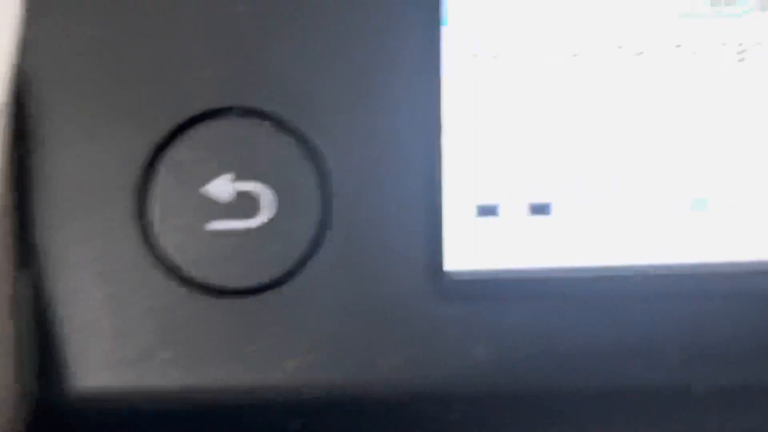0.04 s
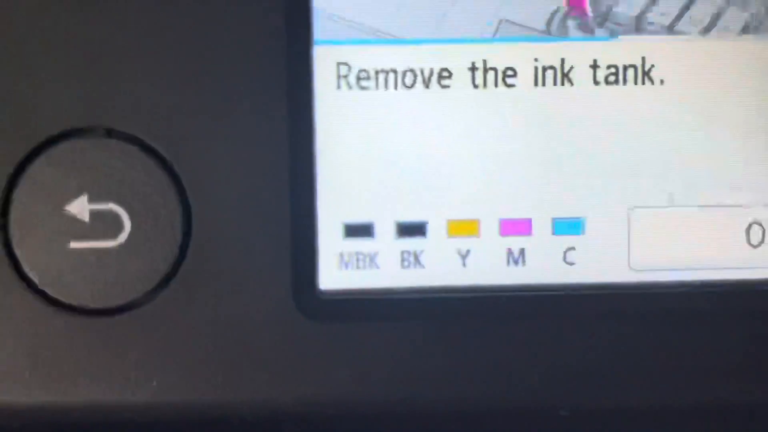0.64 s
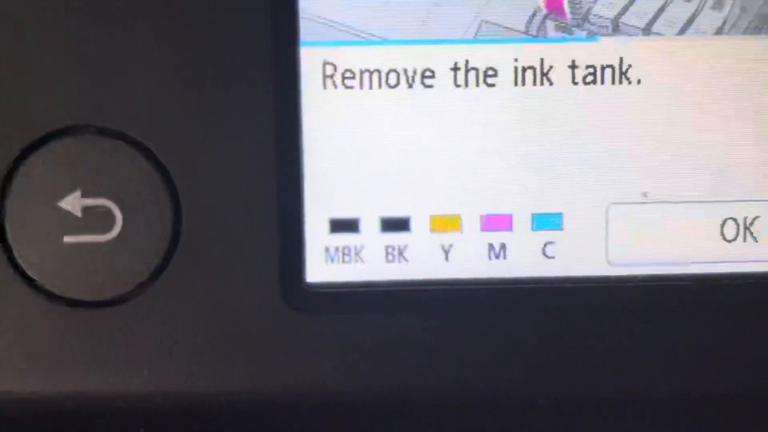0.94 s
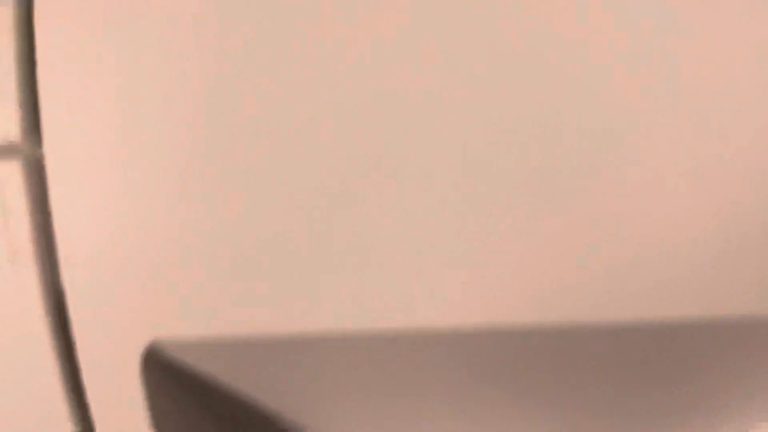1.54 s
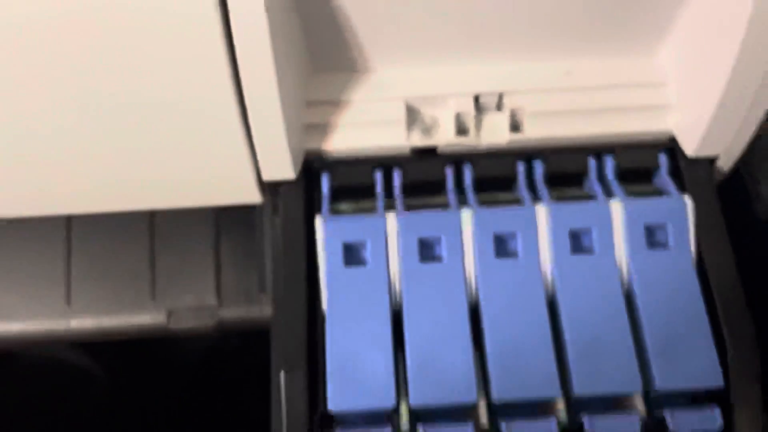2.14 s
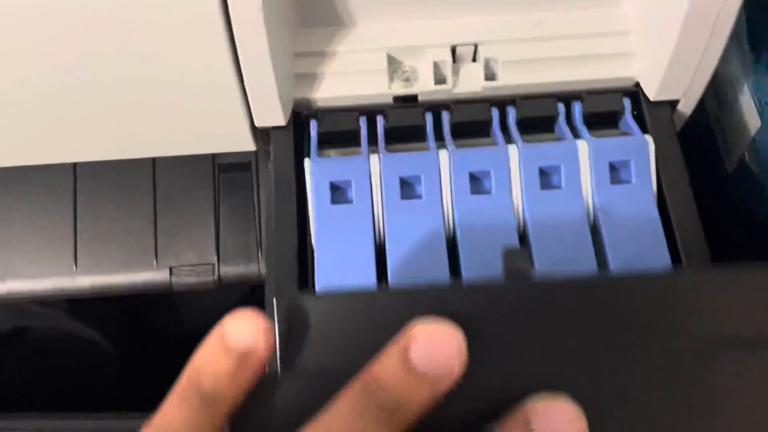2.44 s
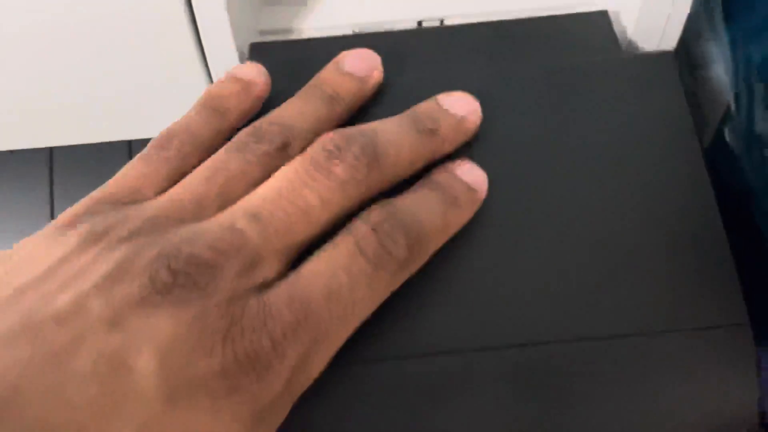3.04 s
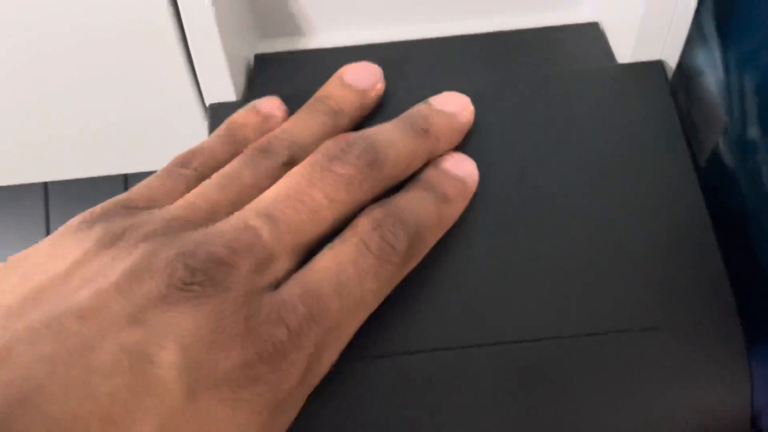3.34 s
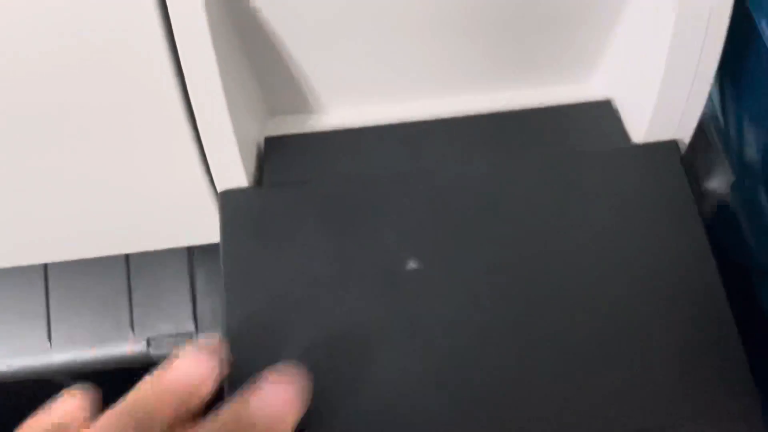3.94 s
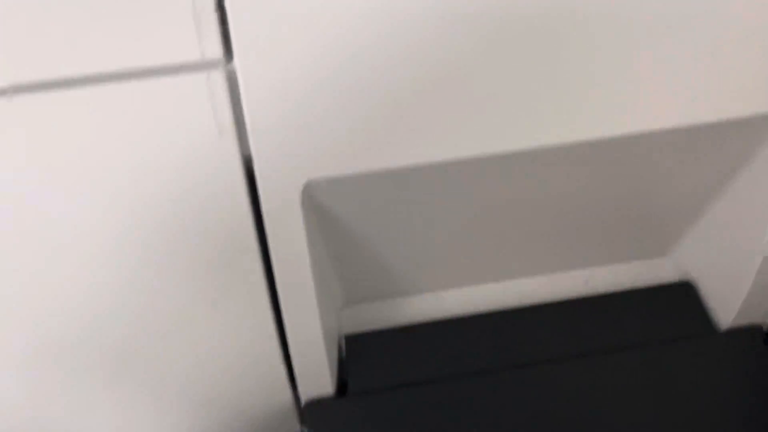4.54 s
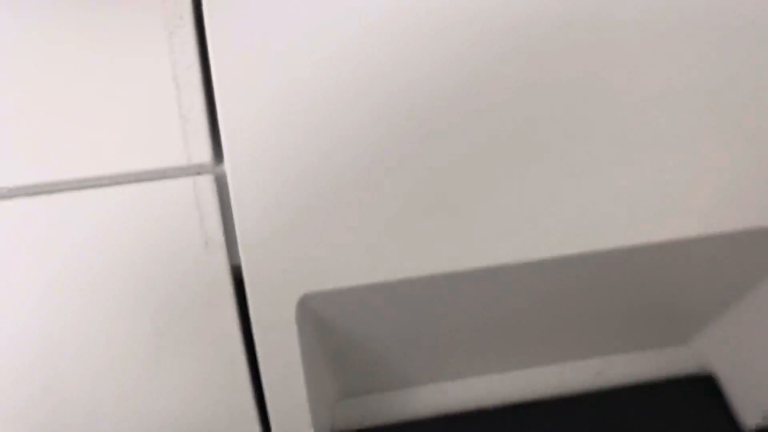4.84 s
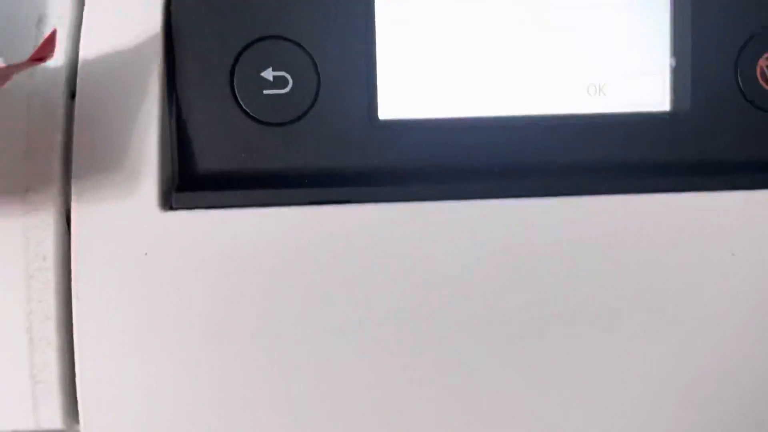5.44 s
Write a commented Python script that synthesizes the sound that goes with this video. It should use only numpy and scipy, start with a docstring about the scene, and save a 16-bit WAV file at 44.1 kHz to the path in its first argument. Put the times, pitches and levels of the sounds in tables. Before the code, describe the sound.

Over a deep hum, a printer's plastic cover rattles down and latches with a hollow snap before its gears briefly whir.

```python
"""Shutting a printer's ink cover

In a small room, fingers tap lightly on a large printer. Its plastic cover clatters down and the latch
snaps home, each blow making the hollow casing ring. A limiter turns everything down at the loudest
moment, so the steady hum dips too. The hand rubs softly along the casing; then the printer's drive
starts up, its gears whirring and its parts clunking. A thin whine and moving air lie behind it all."""
import sys
import numpy as np
from scipy import signal
from scipy.fft import rfft, irfft, next_fast_len
from scipy.io import wavfile
from scipy.ndimage import uniform_filter1d, minimum_filter1d

SR = 44100
rng = np.random.default_rng(int(sys.argv[2]) if len(sys.argv) > 2 else 0)


def wav_out(sig):
    """Save sig, one row per channel (or a flat mono array), as 16-bit PCM at SR to the path in sys.argv[1]."""
    wavfile.write(sys.argv[1], SR, np.round(np.clip(np.atleast_2d(sig).T, -1, 1) * 32767).astype(np.int16))


N = 250929
TIME = np.arange(N) / SR

# Levels are relative: 6 dB more is twice the swing. A ring_s is the time to fade by 60 dB.
# Knocks of the cover: start_s, strength_db, bass_db, crack_db, tick_db, spot_pitch_hz, spot_db
COVER_KNOCKS = [(2.765, -38, -23, -20.5, -16, 890, 6), (2.8106, -22.5, -23, -30, -31, 1170, 3.5),
                (2.83, -41.5, -10, -5, -22, 3950, 18), (2.91, -46.5, -8, -35, -22.5, 647, 6.5),
                (2.946, -49.5, -9, -10.5, -0.5, 1510, 7.5), (2.969, -30.5, -13.5, -5.5, 0, 1050, 9),
                (3.043, -21, -4, -11, -16.5, 1363, 6), (3.053, -19.5, -5.5, -27.5, -34.5, 1068, 6),
                (3.087, -17, -8.5, -20, -20.5, 798, -0.5), (3.116, -31, -1.5, -11, -29, 1190, 8),
                (3.217, -26, -11.5, -13.5, -27.5, 950, 9), (3.286, -37, -3, -24.5, -31, 1130, 7),
                (3.63, -41, -5.5, -36, -4, 830, 6), (3.644, -46, 7, -4.5, -16.5, 1080, 2),
                (3.692, -39, 1, -14.5, -29, 772, 9)]
# The latch snaps in: start_s, strength_db, bass_db, crack_db, tick_db
LATCH_SNAPS = [(3.314, -16.5, -18.5, -5.5, -10), (3.3196, 1.5, -22.5, -8.5, -11.5),
               (3.3223, 0.5, -17, -13, -11), (3.33, -11, -4, -5, -6.5)]
# Tone colour of a blow on plastic: pitch_hz, level_db
PLASTIC_COLOUR = [(30, 7), (110, 41.5), (280, 42), (450, 30.5), (700, 31), (1250, 29), (2000, 26.5),
                  (3000, 33), (3900, 29), (7000, 25), (10500, 22.5), (14500, 19)]
# Modes (pitches at which a thing likes to ring) of the plastic panel: pitch_hz, width_hz, level_db
PANEL_MODES = [(277, 25, 8), (514.7, 13, -2), (840, 35, -6.5), (1076, 60, -5), (1210, 71.6, -0.5),
               (1798, 177, 0.5), (2370, 76, 1), (2608, 89, -2.5), (4556, 23, -1.5), (5270, 22, 1.5)]
# Pushes that rock the whole cabinet: start_s, level_db
CABINET_PUSHES = [(3.047, -22), (3.056, -26.5), (3.096, -24.5), (3.227, -34), (3.3256, 2.5), (3.697, -36.5)]
# The cabinet's deep modes: pitch_hz, level_db, ring_s
CABINET_MODES = [(106, -1, 0.058), (132.4, -11, 0.096)]
# The cover booms as it lands: start_s, level_db, landing_pitch_hz, resting_pitch_hz
COVER_BOOMS = [(2.812, -32.5, 287, 248), (3.05, -30.5, 402, 249.7), (3.092, -25, 325, 266.4),
               (3.33, -18.5, 233, 230.5)]
# Tone colour of the brief hiss that swells into the snap: pitch_hz, level_db
SNAP_SWELL_COLOUR = [(300, 0), (2500, -9), (4000, 1.5), (7000, -2.5), (9500, -18.5)]
# The cover scrapes along its guides: start_s, length_s, level_db
COVER_SCRAPES = [(2.779, .03, -46.5), (3.056, .02, -40.5), (3.193, .04, -54.5)]

# Runs of the printer's drive: start_s, length_s, whirr_end_db, rumble_end_db
DRIVE_RUNS = [(4.986, 0.547, -57.5, -60.5), (5.488, 0.25, -59, -52.5)]
# Modes of the drive and its frame: pitch_hz, width_hz, level_db
FRAME_MODES = [(762, 69, 2), (950, 45, 3.5), (1210, 61, -0.5), (1874, 92, 6), (3300, 135, 9)]
# Tone colour of the drive's whirr: pitch_hz, level_db
DRIVE_WHIRR_COLOUR = [(150, -51), (450, 11.5), (800, 0.5), (1300, 1.5), (1600, -4.5), (2150, -12.5),
                      (2700, -8.5), (3400, -18.5), (5000, -25), (8000, -30.5)]
# Tone colour of the drive's rumble: pitch_hz, level_db
DRIVE_RUMBLE_COLOUR = [(60, -6), (110, 5.5), (170, 4.5), (290, 1.5), (400, 0.5), (560, 1.5), (900, -49)]
# Tones of the meshing gear teeth: pitch_hz, level_db
TOOTH_TONES = [(404, 0), (942, -8), (1300, 7), (1700, -1.5), (1880, -13), (2630, 0)]
# A bearing squeaks as the drive gets going: start_s, length_s, level_db
BEARING_SQUEAKS = [(5.073, 0.021, -68), (5.124, 0.031, -75)]
# Clunks of the drive: start_s, strength_db, bass_db, crack_db, tick_db
DRIVE_CLUNKS = [(5.074, -30, 0.5, -21.5, -18.5), (5.509, -26, -13, -19.5, -20),
                (5.514, -28.5, -5, -28, -36)]

# Light finger taps: start_s, strength_db, brightness_db_per_octave, spot_pitch_hz
FINGER_TAPS = [(1.654, -57, -5, 484), (1.759, -61, -6, 505), (1.853, -57, 1.5, 720), (1.878, -57, -6, 440),
               (1.923, -58, -3, 1240), (1.98, -57, -0.5, 715), (2.07, -56.5, 9, 1900),
               (2.094, -56, -5, 790), (2.16, -56.5, 7, 1840), (2.189, -52.5, 0.5, 735),
               (2.31, -55.5, 11.5, 2000), (2.338, -52.5, -1, 544), (2.416, -51.5, -6, 445)]
# Modes of the hollow casing under those taps: pitch_hz, width_hz, level_db
CASING_MODES = [(444.5, 40, -3), (744, 45, -5), (898, 16, 4), (1067, 16, -5), (1260, 17, 5), (1830, 71, -8)]
# Fingers brush over the cover: start_s, length_s, end_db
FINGER_BRUSHES = [(1.889, 0.157, -75.5), (2.09, 0.032, -63.5), (2.78, 0.054, -65.5), (2.983, 0.13, -63),
                  (3.191, 0.053, -59), (3.562, 0.07, -63), (3.626, 0.078, -59), (4.414, 0.33, -78.5)]
# Tone colour of skin sliding on plastic: pitch_hz, level_db
SKIN_COLOUR = [(100, -9), (600, 17), (1400, 1.5), (2500, 3), (4500, -4), (7000, -6), (9000, -1.5),
               (12000, -1), (14500, -1.5), (16000, -9.5)]
# Soft rubs as the hand draws back: start_s, length_s, end_db
HAND_RUBS = [(4.456, 0.16, -74), (4.747, 0.122, -66)]
# Tone colour of rubbing or scraping on the casing: pitch_hz, level_db
CASING_RUB_COLOUR = [(200, -4), (600, -2.5), (1150, 0.5), (1600, -11), (2600, -8.5), (5000, -27),
                     (9000, -35.5)]

# How the hum rises and falls: time_s, level_db
HUM_LEVELS = [(0.1, -44.5), (0.29, -47.5), (.7, -44.5), (1.2, -43.5), (1.65, -47.5), (2.7, -44.5),
              (3.85, -44), (4.13, -48.5), (4.25, -44.5), (5.27, -43), (5.6, -46.5)]
# Thin tones of the electric whine: pitch_hz, width_hz, level_db
WHINE_TONES = [(2756, 35, -1), (2975, 70, 0), (5030, 110, -8), (6590, 110, -7)]
# Short swells of the whine: start_s, length_s, pitch_hz, end_db
WHINE_SURGES = [(0.997, 0.29, 2860, -90), (1.928, .12, 2900, -78.5)]
# Tone colour of the room's air and the microphone hiss: pitch_hz, level_db
AIR_COLOUR = [(20, -79.5), (45, -62), (80, -64.5), (200, -80), (320, -90), (700, -103), (1300, -106),
              (2100, -113), (6700, -114), (8700, -126), (12000, -119), (14200, -113), (15300, -128)]
# How long the room rings, from low to high: pitch_hz, ring_s
ROOM_RING_TIMES = [(100, 0.89), (300, 0.45), (1000, 0.32), (3000, .36), (7000, 0.33), (10000, 0.22)]
# A standing wave that lingers between the walls: pitch_hz, width_hz, level_db
STANDING_WAVES = [(228, 1.5, 13)]
# How far the left microphone's wave runs ahead of the right's: pitch_hz, lead_radians
LEFT_LEAD = [(100, .1), (500, .4), (1100, .5), (2000, 1.5), (3000, 1.6), (4300, .4), (5700, -1.7),
             (6600, -.8), (7700, -2.9), (10000, -3.5), (11700, -5.2), (13000, -5.8)]
# How much louder the left microphone is: pitch_hz, left_minus_right_db
LEFT_BALANCE = [(60, -1.3), (130, -.5), (260, 1.4), (900, .2), (2000, 2.4), (4000, .4)]


def cover_and_latch(bare_db=-5, modes_db=-4, latch_to_room_db=-1.0):
    """The cover clatters and the latch snaps. Gives the ringing casing and the bare blows for the room."""
    near, to_room = np.zeros((2, N)), np.zeros(N)
    for start, *touch, spot_hz, spot_db in COVER_KNOCKS:
        hollow = [(490, 40, 5), (spot_hz, 70, spot_db)]  # pitch_hz, width_hz, level_db
        rattle = signal.fftconvolve(wall_waves(ring_s=.052, click=.36, build_s=.00089), rebounds())
        strike = signal.fftconvolve(rattle, contact(*touch))
        add(near, start, casing(strike, PANEL_MODES, hollow, bare_db, modes_db))
        add(to_room, start, strike)
    for start, *touch in LATCH_SNAPS:
        strike = signal.fftconvolve(wall_waves(ring_s=.033, click=.42, build_s=.0004), contact(*touch))
        add(near, start, casing(strike, PANEL_MODES, [], bare_db, modes_db))
        add(to_room, start, amp(latch_to_room_db) * strike)
    return near, to_room


def contact(strength_db, bass_db, crack_db, tick_db, size=8192):
    """One touch on plastic: heavy ones carry more bass, hard ones more treble (crack and tick)."""
    hz = abs(np.fft.fftfreq(size, 1 / SR))
    touch_colour = [(300, bass_db), (400, .0026), (1500, .0081),
                    (3300, crack_db), (7000, crack_db), (11000, tick_db)]
    log_gain = np.log(amp(strength_db + read(touch_colour, hz) + read(PLASTIC_COLOUR, hz)))
    # this step makes the colour ring out after the touch, never before it
    spectrum = np.exp(np.conj(signal.hilbert(log_gain)))
    return np.fft.ifft(spectrum).real[:size // 2]


def wall_waves(ring_s, click, build_s, size=8192):
    """A first click, then waves of all pitches that build up and bounce about in the struck wall."""
    t = TIME[:size]
    fade = die_away(t, ring_s) * (1 - np.exp(-t / build_s))
    burst = rng.standard_normal(size) * fade
    even = irfft(np.exp(1j * np.angle(rfft(burst))))  # every pitch equally strong
    loudness = np.sqrt(abs(uniform_filter1d(even ** 2, size=64)) + 1e-20)
    waves = even / loudness * fade
    return waves / np.linalg.norm(waves) + click * signal.unit_impulse(size)


def rebounds(level_db=-15, span_s=.018, count=3):
    """One touch, then the loose cover rattles against its frame a few more times, more dully."""
    bounces = np.zeros(SR // 8)
    when, size = rng.random((2, count))
    strengths = amp(level_db) * (.5 + size) * (1 - when / 2)
    np.add.at(bounces, (when * span_s * SR).astype(int), strengths)
    dull = signal.lfilter(*signal.butter(2, 2200, fs=SR), bounces)
    return dull + signal.unit_impulse(len(dull))


def casing(strike, modes, spot_modes, bare_db, modes_db, stereo_spread=.91, size=16384):
    """A blow rings the struck spot and the casing's modes, favouring some of them by chance."""
    hz = np.fft.rfftfreq(size, 1 / SR)
    place, lean, lag = rng.standard_normal((3, len(modes)))
    favour = unit(amp(2.5 * np.clip(place, -2, 2)))
    # higher modes differ more between left and right, in both level and timing
    highness = np.minimum(np.array(modes)[:, 0] / 1500, 1)
    difference = highness * (.5 * np.tanh(lean) + 1j * lag)
    shares = favour * np.exp(np.outer([stereo_spread, -stereo_spread], difference))
    ring = amp(modes_db) * shares @ resonances(modes, hz) + resonances(spot_modes, hz).sum(0)
    return irfft(rfft(strike, size) * (amp(bare_db) + ring))


def cabinet_thumps():
    """Heavy pushes set the whole cabinet swinging for a few cycles."""
    t, out = TIME[:SR // 2], np.zeros(N)
    swing = -sum(amp(db) * np.sin(2 * np.pi * hz * t) * die_away(t, ring_s)
                 for hz, db, ring_s in CABINET_MODES)
    for start, db in CABINET_PUSHES:
        add(out, start, amp(db) * swing)
    return out


def cover_booms(settle_s=.012, ring_s=.16):
    """The cover's lowest note sinks in pitch as the contact relaxes."""
    t, out = TIME[:SR // 2], np.zeros(N)
    for start, db, landing_hz, rest_hz in COVER_BOOMS:
        pitch_hz = rest_hz + (landing_hz - rest_hz) * np.exp(-t / settle_s)
        cycles = np.cumsum(pitch_hz) / SR
        add(out, start, amp(db) * np.sin(2 * np.pi * cycles) * die_away(t, ring_s))
    return out


def snap_swell(level_db=-23, growth_s=.0063):
    """A very brief hiss swells into the latch's snap."""
    until_snap_s = LATCH_SNAPS[1][0] - TIME
    gain = amp(level_db) * np.exp(-abs(until_snap_s) / growth_s) * (until_snap_s > 0)
    hiss = crackle(clicks_per_s=11000, spread_db=3, uneven_db=3.5)
    return gain * coloured(hiss, SNAP_SWELL_COLOUR)


def cover_scrapes():
    """The cover's edge sticks and slips along its guides, ringing the panel."""
    pressure = sum(stroke(*row, rise_s=.008, fall_s=.008) for row in COVER_SCRAPES)
    slips = crackle(clicks_per_s=1200, spread_db=2, uneven_db=1.5)
    return pressure * coloured(slips + ringing(slips, PANEL_MODES), CASING_RUB_COLOUR)


def drive(rise_s=.058, fall_s=.03, gears_db=-11):
    """Gears and sliding parts whirr over a low growl, loudest as the drive takes up its load."""
    whirr_gain = rumble_gain = 0
    for start, length, whirr_db, rumble_db in DRIVE_RUNS:
        whirr_gain += stroke(start, length, whirr_db, rise_s, fall_s, swell_db=-4)
        rumble_gain += stroke(start, length, rumble_db, rise_s, fall_s, swell_db=-9)
    slips = crackle(clicks_per_s=3500, spread_db=2, uneven_db=1.5)
    judder = crackle(clicks_per_s=400, spread_db=2, uneven_db=1)
    frame_ring = sum(ringing(slips, [mode]) * amp(4.5 * wander(10)) for mode in FRAME_MODES)
    whirr = coloured(slips + frame_ring, DRIVE_WHIRR_COLOUR) + amp(gears_db) * gears()
    growl = ringing(judder, [(318, 40, 2.5)])  # pitch_hz, width_hz, level_db
    rumble = coloured(judder + growl, DRIVE_RUMBLE_COLOUR)
    return whirr_gain * whirr + rumble_gain * rumble + bearing_squeaks()


def gears(waver_db=5):
    """The meshing teeth sing in uneven tones that share one slightly unsteady speed."""
    turned_s = np.cumsum(1 + .02 * wander(30)) / SR
    return unit(sum(amp(db + waver_db * wander(22)) * np.sin(2 * np.pi * hz * turned_s)
                    for hz, db in TOOTH_TONES))


def bearing_squeaks():
    """A bearing gives brief, fuzzy squeaks."""
    gain = sum(stroke(*row, rise_s=.012, fall_s=.0037) for row in BEARING_SQUEAKS)
    return gain * fuzzy_whistle(pitch_hz=4260, width_hz=480)


def drive_clunks():
    """Parts of the drive take up their slack with a short scraping clunk that rings the frame."""
    out = np.zeros((2, N))
    for start, *touch in DRIVE_CLUNKS:
        strike = signal.fftconvolve(wall_waves(ring_s=.08, click=.03, build_s=.0019), contact(*touch))
        add(out, start, casing(strike, FRAME_MODES, [], bare_db=-11.5, modes_db=-4))
    return out


def finger_taps(crack_octaves=1.1):
    """Fingertips tap, each on its own spot: soft taps ring the low modes, bright ones the high."""
    out = np.zeros((2, N))
    for start, db, brightness, spot_hz in FINGER_TAPS:
        modes = [(hz, width, level + brightness * np.log2(hz / 1000))
                 for hz, width, level in CASING_MODES]
        hollow = [(spot_hz, 70, 9.5)]  # pitch_hz, width_hz, level_db
        pulse = contact(db, bass_db=-7.5, crack_db=-18.5 + crack_octaves * brightness, tick_db=-9.5)
        strike = signal.fftconvolve(wall_waves(ring_s=.06, click=.15, build_s=.0031), pulse)
        add(out, start, casing(strike, modes, hollow, bare_db=-4, modes_db=10))
    return out


def finger_brushes():
    """Fingers slide lightly over the cover, so many tiny slips blend into a hiss."""
    pressure = sum(stroke(*row, rise_s=.02, fall_s=.006, swell_db=-5.5) for row in FINGER_BRUSHES)
    slips = crackle(clicks_per_s=19000, spread_db=1.5, uneven_db=0)
    return pressure * coloured(slips, SKIN_COLOUR)


def hand_rubs():
    """The hand rubs softly along the hollow casing, pressing harder as it goes."""
    pressure = sum(stroke(*row, rise_s=.12, fall_s=.016, swell_db=3) for row in HAND_RUBS)
    slips = crackle(clicks_per_s=3800, spread_db=-2.5, uneven_db=0)
    return pressure * coloured(slips, CASING_RUB_COLOUR)


def hum(pitch_hz=59.2, drift_hz=.4, boost_db=.5, waver_db=.9, drone_hz=169.7):
    """A deep, nearly pure machine hum wavers a little; a faint drone above it comes and goes once."""
    course_db = np.interp(TIME, *np.transpose(HUM_LEVELS))
    cycles = np.cumsum(pitch_hz + drift_hz * wander(3.96)) / SR
    deep = amp(boost_db + course_db + waver_db * wander(4.6)) * np.sin(2 * np.pi * cycles)
    drone_gain = stroke(start_s=.532, length_s=.333, end_db=-66.5, rise_s=.11, fall_s=.058)
    drone = drone_gain * np.sin(2 * np.pi * drone_hz * TIME)
    return np.sqrt(2) * (deep + drone)


def whine(level_db=-90, waver_db=2):
    """The idling printer sings in a few thin, fuzzy tones; now and then one swells and breaks off."""
    tones = sum(ringing(rng.standard_normal(N), [tone]) * amp(waver_db * wander(4))
                for tone in WHINE_TONES)
    out = amp(level_db) * unit(tones)
    for start, length, hz, db in WHINE_SURGES:
        gain = stroke(start, length, db, rise_s=.071, fall_s=.018, swell_db=-1.5)
        out += gain * fuzzy_whistle(hz, width_hz=340)
    return out


def air(rumble_db=-59.5, hiss_db=-88.5, hiss_above_hz=900):
    """Ventilation rumble reaches both microphones alike; the hiss above it differs between them."""
    def hiss_colour(hz):
        return amp(read(AIR_COLOUR, hz)) * hz ** 2 / (hz ** 2 + hiss_above_hz ** 2)
    rumble = coloured(rng.standard_normal(N), AIR_COLOUR)
    hiss = unit(filtered(rng.standard_normal((2, N)), hiss_colour))
    return amp(rumble_db) * rumble + amp(hiss_db) * hiss


def room(sound, build_s=.0028, stereo_spread=.6):
    """Echoes blur into a tail that builds quickly and lasts longest in the bass; one low note lingers."""
    common, side = rng.standard_normal((2, SR))
    noise = np.array([common + stereo_spread * side, common - stereo_spread * side])
    hz, t, bands = signal.stft(noise, SR, nperseg=256)
    fading = bands * die_away(t, read(ROOM_RING_TIMES, hz)[:, None])
    tail = signal.istft(fading, SR, nperseg=256)[1][:, :SR]
    tail *= 1 - np.exp(-(TIME[:SR] / build_s) ** 2)
    echoes = signal.fftconvolve(sound[None], tail / np.linalg.norm(tail[0]), axes=1)[:, :N]
    return echoes + ringing(sound, STANDING_WAVES)


def microphones(sound):
    """The body that holds the two microphones shifts timing and level between left and right."""
    def left_and_right(hz):
        left = amp(read(LEFT_BALANCE, hz) / 2) * np.exp(.5j * read(LEFT_LEAD, hz))
        return np.array([left, 1 / left])
    return filtered(sound, left_and_right)


def crackle(clicks_per_s, spread_db, uneven_db):
    """Many tiny clicks of unequal size; uneven_db sets how much their level wavers."""
    sizes = amp(spread_db * np.minimum(rng.exponential(1, N), 4)) * rng.standard_normal(N)
    clicking = rng.random(N) < clicks_per_s / SR
    return sizes * clicking * amp(uneven_db * wander(35))


def stroke(start_s, length_s, end_db, rise_s, fall_s, swell_db=0):
    """A loudness curve: fades in, changes by swell_db on its way to end_db, then dies away."""
    t = TIME - start_s
    rise = np.clip(t / rise_s, 0, 1)
    fall = np.exp(-np.maximum(t - length_s, 0) / fall_s)
    progress = np.clip(t / length_s, 0, 1)
    return rise * fall * amp(end_db + swell_db * (progress - 1))


def fuzzy_whistle(pitch_hz, width_hz):
    """Noise passed twice through one mode becomes a fuzzy whistle."""
    mode = [(pitch_hz, width_hz, 0)]
    return unit(ringing(ringing(rng.standard_normal(N), mode), mode))


def ringing(sound, modes):
    """What a set of modes gives back when a sound shakes them."""
    return filtered(sound, lambda hz: resonances(modes, hz).sum(0))


def resonances(modes, hz):
    """How each mode answers at hz, one row a mode; narrow ones ring longer."""
    return np.array([amp(db) / (1 + 2j * (hz - pitch) / width) for pitch, width, db in modes])


def wander(rate_hz):
    """A random wobble of typical size 1, with up to about rate_hz changes a second."""
    return unit(filtered(rng.standard_normal(N), lambda hz: np.exp(-(hz / rate_hz) ** 2)))


def coloured(sound, colour):
    """Gives a sound a tone colour, at typical size 1."""
    return unit(filtered(sound, lambda hz: amp(read(colour, hz))))


def filtered(sound, response):
    """Turns each pitch up or down by response(hz)."""
    size = next_fast_len(N + SR)
    hz = np.fft.rfftfreq(size, 1 / SR)
    return irfft(rfft(sound, size) * response(hz), size)[..., :N]


def read(points, hz):
    """Looks up a table's value at hz, gliding between its rows with octaves evenly spaced."""
    pitches, values = np.transpose(points)
    return np.interp(np.log(hz + 1), np.log(pitches + 1), values)


def add(mix, start_s, sound):
    """Lays a sound into the mix at start_s."""
    part = mix[..., round(start_s * SR):][..., :sound.shape[-1]]
    part += sound[..., :part.shape[-1]]


def die_away(t, ring_s):
    """A fade that drops 60 dB every ring_s."""
    return np.exp(-np.log(1000) * t / ring_s)


def amp(db):
    """Turns decibels into a number to multiply by."""
    return 10 ** (np.asarray(db) / 20)


def unit(sound):
    """Scales a sound so that its typical size (root mean square) is 1."""
    return sound / np.sqrt(np.mean(sound ** 2) + 1e-20)


def scene(knock_room_db=-15, tap_room_db=-14, rustle_room_db=-10, thump_room_db=-29):
    """The cover, the hand and the drive sound in the room, over the hum, the whine and the air."""
    knocks, bare_blows = cover_and_latch()
    taps = finger_taps() + drive_clunks()
    rustles = finger_brushes() + snap_swell() + cover_scrapes() + hand_rubs() + drive()
    thumps = cabinet_thumps() + cover_booms()
    echoes = room(amp(knock_room_db) * bare_blows + amp(tap_room_db) * taps.mean(0)
                  + amp(rustle_room_db) * rustles + amp(thump_room_db) * thumps)
    return microphones(knocks + taps + rustles + thumps + hum() + whine() + echoes) + air()


def record(dry, ceiling_db=-12.0, hold_s=.14, recover_db_per_s=150, peak=.85, top_hz=16500):
    """A limiter turns loud blows down, holds and lets go; peaks are rounded and the top treble is cut."""
    power = abs(uniform_filter1d((dry ** 2).mean(0), size=160))
    over_db = np.maximum(10 * np.log10(power + 1e-12) - ceiling_db, 0)
    reach = int(hold_s * SR / 2)
    held_db = -minimum_filter1d(-over_db, 2 * reach + 1, origin=reach)  # highest in the last hold_s
    recovery_db = TIME * recover_db_per_s
    released_db = np.maximum.accumulate(held_db + recovery_db) - recovery_db
    dip_db = uniform_filter1d(released_db, size=80)
    rounded = peak * np.tanh(dry * amp(-dip_db) / peak)
    treble_cut = signal.firwin(301, top_hz, window=("kaiser", 8), fs=SR)
    return signal.oaconvolve(rounded, treble_cut[None], "same")


dry = scene()
out = record(dry)
wav_out(out)
```